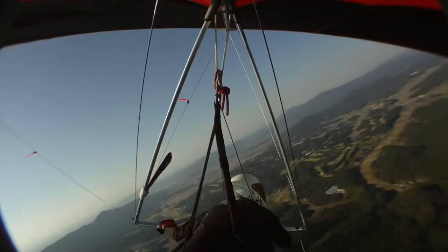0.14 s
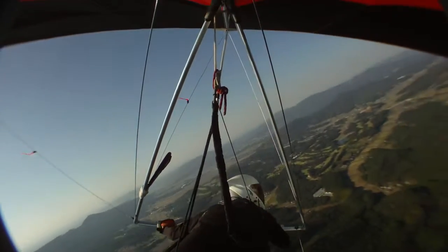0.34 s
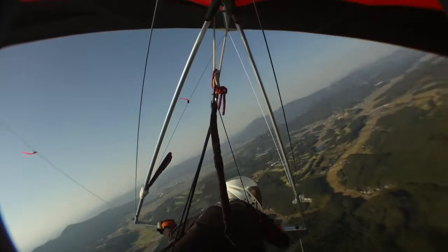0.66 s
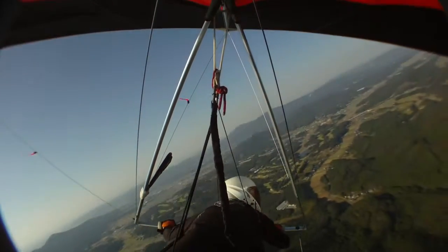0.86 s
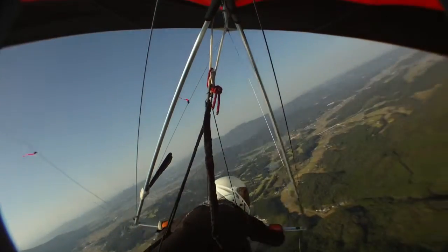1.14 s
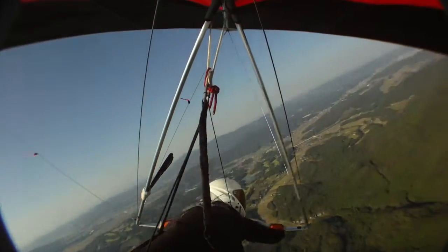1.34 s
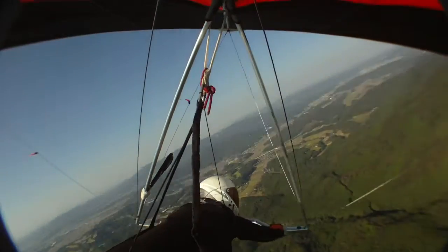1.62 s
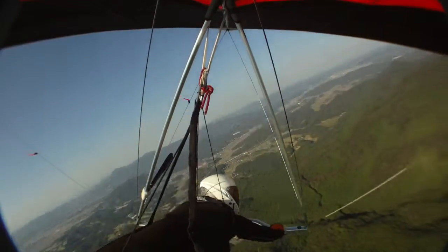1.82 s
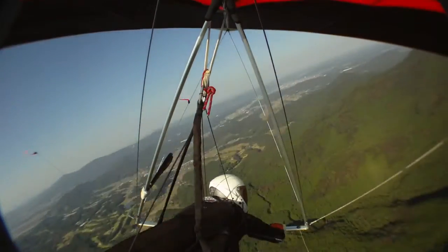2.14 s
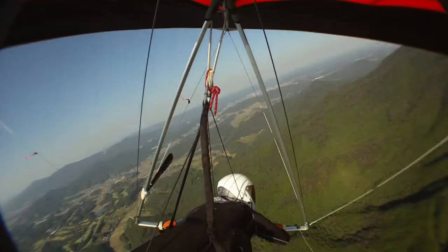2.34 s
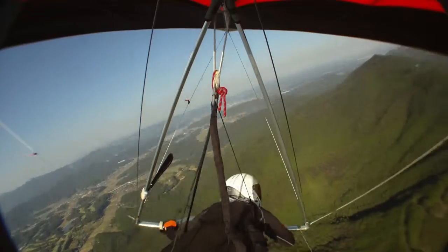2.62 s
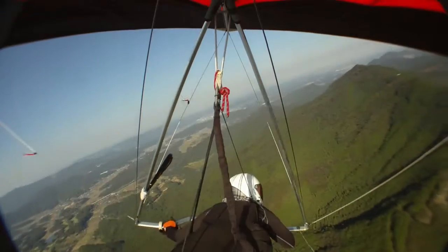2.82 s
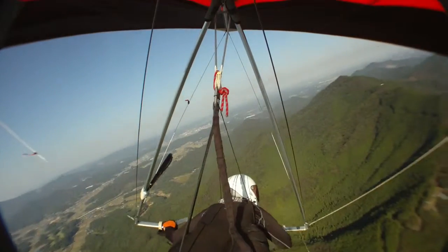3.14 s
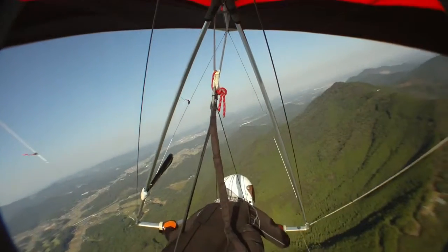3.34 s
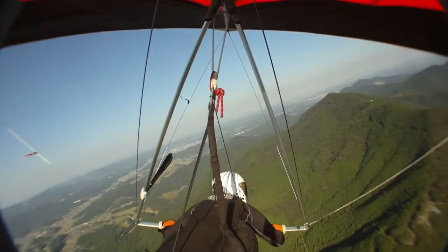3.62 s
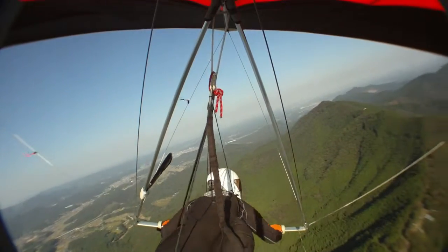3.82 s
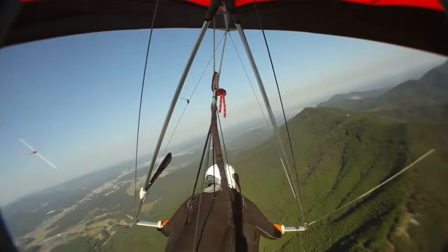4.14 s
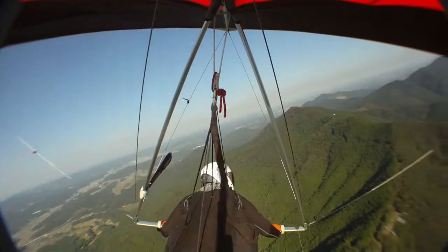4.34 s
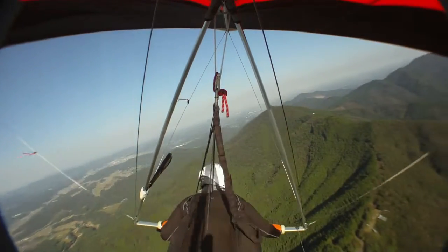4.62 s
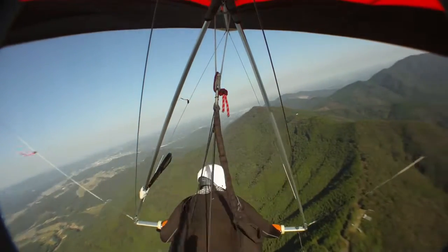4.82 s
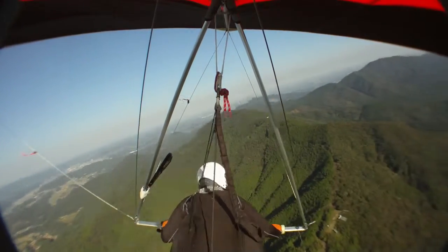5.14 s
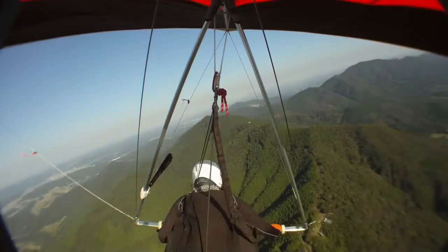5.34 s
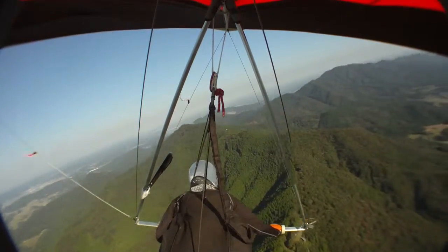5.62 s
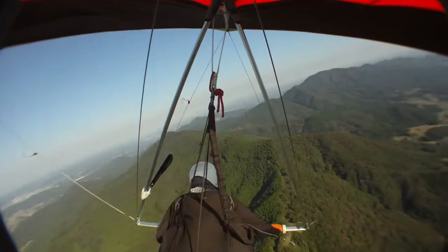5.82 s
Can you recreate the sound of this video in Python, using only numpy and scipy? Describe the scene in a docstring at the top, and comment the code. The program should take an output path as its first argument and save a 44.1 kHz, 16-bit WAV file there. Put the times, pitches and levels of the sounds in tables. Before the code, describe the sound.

Strong, unbroken wind roar buffets a camera on a hang glider, with a low wavering hum and thin fluttering hiss, slightly overloaded.

```python
"""High in open air, with no echo, air rushes past a camera on the keel of a hang glider in a banked turn.
Eddy pressure buffets the housing as shaped noise; finer turbulence hisses and puffs at its edges.
Vortices shed by the frame hum at a pitch proportional to airspeed, over a rumble of the largest eddies.
The overloaded recorder clips the peaks, and its uneven sampling adds a thin sizzle near 12 kHz."""
import sys
import numpy as np
from scipy import signal
from scipy.fft import rfft, irfft
from scipy.io import wavfile
from scipy.ndimage import uniform_filter1d, map_coordinates

SR = 44100
rng = np.random.default_rng(int(sys.argv[2]) if len(sys.argv) > 2 else 0)


def log_audio(samples):
    """Write samples as a 16-bit WAV file to the path given in sys.argv[1]."""
    # one column per channel
    frames = np.atleast_2d(samples).T
    # limit to full scale, then quantise
    limited = np.clip(frames, -1, 1)
    pcm = np.round(limited * 32767).astype(np.int16)
    wavfile.write(sys.argv[1], SR, pcm)


N = 263277
TIME = np.arange(N) / SR  # seconds
FREQ = np.maximum(np.arange(N // 2 + 1) * SR / N, 1)  # Hz, kept above zero for the logarithm

# Spectrum of the rumble of the largest eddies. Each row: frequency in Hz, relative density in dB per Hz.
RUMBLE_SPECTRUM = [(15, 3), (35, -1), (60, 0.5), (120, -0.5), (200, -11), (400, -1), (1000, -61)]
# Course of the rumble, before its random swells. Each row: time in seconds, level in dB.
RUMBLE_COURSE = [(0, -12), (1.0, -18.5), (1.3, -12), (1.8, -19.5), (2.8, -14.5), (3.1, -22.5), (3.8, -10.5),
                 (5.2, -23.5), (5.97, -19.5)]
# Pitch of the vortex hum, proportional to airspeed, before its waver. Each row: time in seconds, pitch in Hz.
HUM_PITCH_COURSE = [(0, 216.2), (.4, 233), (.9, 218), (1.4, 231), (1.52, 219), (1.9, 225), (2.0, 241),
                    (2.35, 209), (2.95, 218), (3.3, 246), (3.5, 231), (3.85, 261), (4.4, 248), (4.6, 256),
                    (4.8, 244), (5.35, 258), (5.7, 232), (5.97, 254)]
# Strength of the hum, before tone and wake offsets. Each row: time in seconds, relative level in dB.
HUM_COURSE = [(0, -8), (1.15, -13), (1.45, -6), (1.8, -12), (2.05, -5), (3.1, -7), (3.6, -9), (5.97, -7.5)]
# Spectrum of eddies tearing off the housing. Each row: frequency in Hz, relative density in dB per Hz.
PUFF_SPECTRUM = [(300, -15.5), (650, 4), (1100, -1.5), (1700, -10.5), (2200, -15.5), (3300, -24),
                 (4600, -32), (5600, -34), (16000, -58)]
# Spectrum of the hiss at the housing edges. Each row: frequency in Hz, relative density in dB per Hz.
HISS_SPECTRUM = [(300, -12), (700, 2), (1200, 0.5), (1750, -2), (2200, -15.5), (3300, -7), (3700, -16.5),
                 (4600, -12.5), (5400, -29.5), (7000, -32), (16000, -38.5)]
# Cavity resonances colouring the hiss. Each row: centre in Hz, width in Hz, lift in dB.
CAVITY_RESONANCES = [(1650, 270, 6), (2645, 450, 7), (3180, 300, 0), (3980, 470, 6.5), (4750, 330, 2)]
# Tilt of the hiss each port hears alone, against the shared hiss. Each row: frequency in Hz, relative level in dB.
PORT_HISS_TILT = [(700, -23), (1600, -13), (2200, -0.5), (2900, -5), (3700, -5), (4500, -1.5), (5600, 0),
                  (7000, 17.5)]
# Spectrum of the buffeting heard through the housing. Each row: frequency in Hz, relative density in dB per Hz.
BUFFET_SPECTRUM = [(80, -16), (160, -8), (220, 0), (290, 0.05), (350, -2.5), (420, 0), (500, 0), (600, -7),
                   (780, -16.5), (1100, -25.5), (1800, -31.5), (4000, -66.5)]
# Gusts in the roar, hiss and puffs, before small swells. Each row: time in seconds, relative level in dB.
GUST_COURSE = [(0, -2), (.2, 0.5), (.8, -.5), (1.5, .3), (1.85, 0.5), (2.25, -0.1), (2.65, 0.8),
               (3.05, 0.6), (3.4, 0), (5.97, 0.4)]

# levels at mean airspeed, before gusts and recorder (dB)
BUFFET_DB, HISS_DB, PUFF_DB = -4, -24, -23.5
EDGE_GROWTH = 0.67  # growth of hiss and puffs, in dB per dB of airspeed
GLIDER_INERTIA_S = 1.0  # time over which the glider changes its airspeed
SWELL_HZ, SWELL_DB = 5.2, 0.42  # rate and spread of small random swells on the gusts
LULL_COUNT, LULL_S, LULL_DB = 8, 0.014, -4  # brief lulls: number, time from centre to 1/e, depth
PORT_HZ, PORT_LEAD, PORT_DB = 347, 0.057, 0.93  # right port: bass corner, extra phase lead (radians), gain
JITTER_HZ, TOP_HZ = 12000, 15730  # rate of the timing error, edge of the top cut


def undb(db):
    """Amplitude gain is ten to the power of decibels over twenty."""
    return 10 ** (np.asarray(db) / 20)


def unit(x):
    """Division by the root mean square gives a signal of rms 1."""
    return x / np.sqrt(np.mean(x ** 2))


def curve(table):
    """Linear interpolation turns a control table into one value per sample."""
    return np.interp(TIME, *np.transpose(table))


def spectrum(points):
    """Spectral points in dB are joined by straight lines on a log-frequency axis."""
    hz, db = np.transpose(points)
    return np.interp(np.log(FREQ), np.log(hz), db)


def noise(db):
    """Filtering white noise gives a random signal of the wanted spectrum, here of rms 1."""
    white = rfft(rng.standard_normal(N))
    return unit(irfft(white * undb(db), N))


def walk(rate_hz):
    """Low-passed noise is a slow random motion: spread 1, falling 12 dB per octave above the rate."""
    return noise(-10 * np.log10(1 + (FREQ / rate_hz) ** 4))


def build_up(power, build_s):
    """Exponential smoothing run backwards in time grows ahead of each push and stops with it."""
    decay = np.exp(-1 / (build_s * SR))
    backwards = signal.lfilter([1], [1, -decay], power[::-1])
    return backwards[::-1]


def airspeed():
    """Shedding pitch is proportional to airspeed, so its slow part gives airspeed relative to the mean."""
    pitch = uniform_filter1d(curve(HUM_PITCH_COURSE), size=int(GLIDER_INERTIA_S * SR))
    return pitch / np.mean(pitch)


def lulls(count=LULL_COUNT):
    """A lull weakens every sound of the flow at once: a gain that dips briefly at random moments."""
    moments = rng.uniform(0, N / SR, count)
    depth = sum(np.exp(-((TIME - moment) / LULL_S) ** 2) for moment in moments)
    return undb(LULL_DB * depth)


def rumble(swell_db=3.5, swell_hz=3):
    """The largest eddies carry the lowest frequencies and roll past in uneven swells."""
    level_db = curve(RUMBLE_COURSE) + swell_db * walk(swell_hz)
    return noise(spectrum(RUMBLE_SPECTRUM)) * undb(level_db)


def hum(tone_db=0.4, wake_db=-6.0, wake_hz=42, waver=0.03366, waver_hz=35, flutter_db=1.1, wake_growth=1.2):
    """Vortices leave the frame almost in step: an unsteady tone inside a wake that roughens with airspeed."""
    pitch, level_db = curve(HUM_PITCH_COURSE), curve(HUM_COURSE)
    wavering_pitch = pitch * (1 + waver * walk(waver_hz))
    phase = 2 * np.pi * np.cumsum(wavering_pitch) / SR
    tone_level_db = level_db + tone_db + flutter_db * walk(rate_hz=31)
    tone = np.sqrt(2) * np.sin(phase) * undb(tone_level_db)
    # random sine and cosine amplitudes spread the wake into a narrow band around the pitch
    wake = walk(wake_hz) * np.sin(phase) + walk(wake_hz) * np.cos(phase)
    wake_gain = undb(np.mean(level_db) + wake_db) * airspeed() ** wake_growth
    return tone + wake * wake_gain


def puffs(count=380, build_s=0.0022, scatter_db=2.5):
    """Separation: eddies cling to the housing, grow and tear off at random moments in a rough flutter."""
    moments = rng.integers(0, N, count)
    strengths = undb(scatter_db * rng.standard_normal(count))
    power = np.bincount(moments, strengths ** 2, N)
    envelope = np.sqrt(build_up(power, build_s))
    return unit(noise(spectrum(PUFF_SPECTRUM)) * envelope)


def hiss(pressure, speed, follow=0.62, build_s=0.0026, flicker_db=1.13, apart_db=-9, speed_power=2.3):
    """Fine turbulence builds ahead of each big eddy, drops as it passes, and is coloured by the cavities."""
    colour = spectrum(HISS_SPECTRUM)
    for hz, width, lift_db in CAVITY_RESONANCES:
        colour = colour + lift_db / (1 + (2 * (FREQ - hz) / width) ** 2)
    eddy = build_up(pressure ** 2, build_s) ** (follow / 2)
    flicker = undb(flicker_db * walk(rate_hz=73))
    # the finest eddies differ from port to port and grow quickly with airspeed
    own_colour = colour + spectrum(PORT_HISS_TILT)
    own = np.array([noise(own_colour) for port in range(2)]) * speed ** speed_power
    both = noise(colour) + undb(apart_db) * own
    return unit(both * eddy * flicker)


def buffeting(steep=0.039):
    """Eddy pressure drives the housing; a square term makes pushes a little sharper than pulls."""
    pressure = noise(spectrum(BUFFET_SPECTRUM))
    return unit(pressure + steep * (pressure ** 2 - 1))


def ports(pressure):
    """A leak acts as a high-pass: the right port loses bass and so leads the left in phase."""
    high_pass = 1j * FREQ / (1j * FREQ + PORT_HZ)
    leak = high_pass * np.exp(1j * PORT_LEAD) * undb(PORT_DB)
    left, right = pressure
    return np.array([left, irfft(rfft(right) * leak, N)])


def scene():
    """Superposition: gusts scale buffeting, hiss and puffs over rumble and hum; edge noise grows with airspeed."""
    speed = airspeed()
    gust_gain = undb(curve(GUST_COURSE) + SWELL_DB * walk(SWELL_HZ))
    background = rumble() + hum()
    pressure = buffeting()
    edges = undb(HISS_DB) * hiss(pressure, speed) + undb(PUFF_DB) * puffs()
    edges = edges * speed ** EDGE_GROWTH
    roar = undb(BUFFET_DB) * pressure + edges
    air = background + roar * gust_gain
    return ports(air * lulls())


def record(dry, ceiling_db=-7, squeeze=0.57, drive_db=-1.0, jitter=1.104):
    """Overload and aliasing: quick gain control, hard clipping, uneven sampling (in samples), steep top cut."""
    power = uniform_filter1d(np.mean(dry ** 2, axis=0), size=1100)  # over 25 ms
    gain = np.maximum(power / undb(ceiling_db) ** 2, 1) ** (-squeeze / 2)
    clipped = np.clip(dry * gain * undb(drive_db), -1, 1)
    # a periodic timing error mirrors the roar on both sides of its own rate
    place = np.arange(N) + jitter * np.cos(2 * np.pi * JITTER_HZ * TIME)
    sampled = np.array([map_coordinates(c, [place], order=3, mode="nearest") for c in clipped])
    top_cut = signal.ellip(12, .1, 70, TOP_HZ, fs=SR, output="sos")
    return np.clip(signal.sosfilt(top_cut, sampled), -1, 1)


dry = scene()
out = record(dry)
log_audio(out)
```